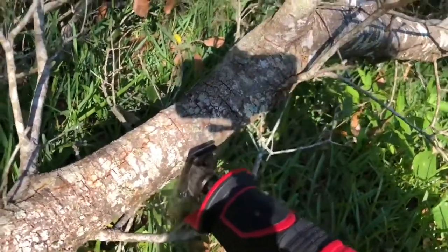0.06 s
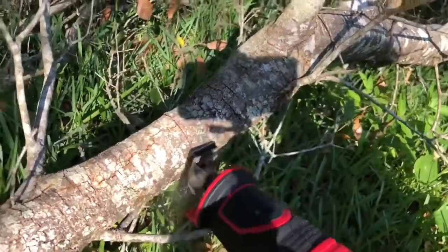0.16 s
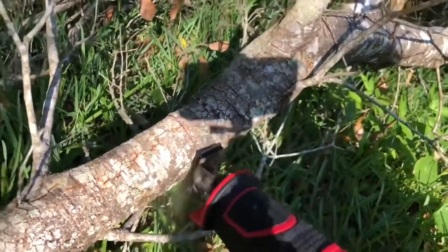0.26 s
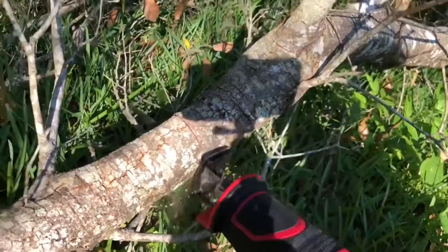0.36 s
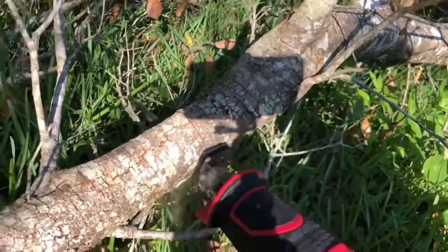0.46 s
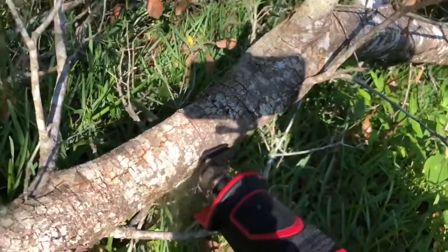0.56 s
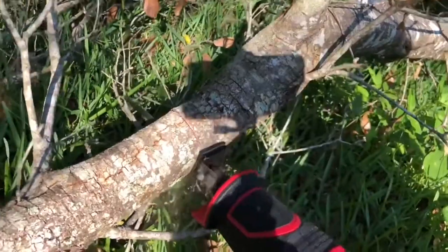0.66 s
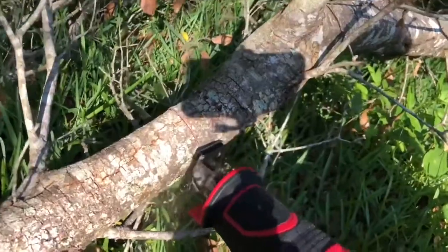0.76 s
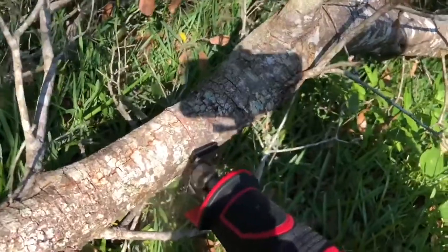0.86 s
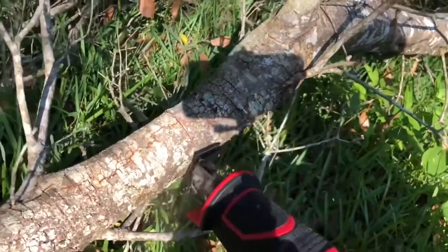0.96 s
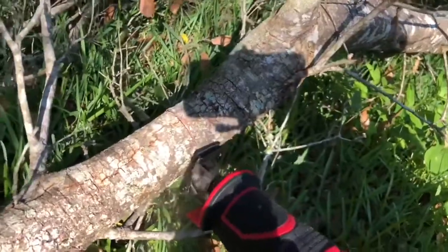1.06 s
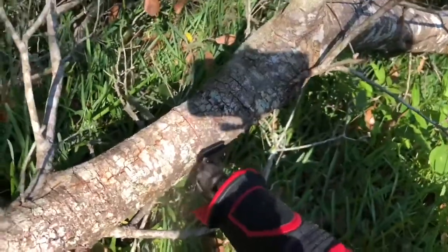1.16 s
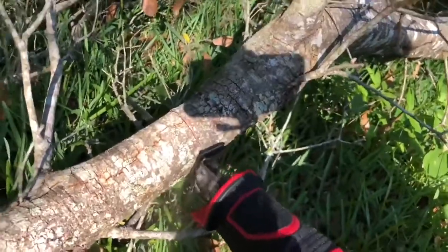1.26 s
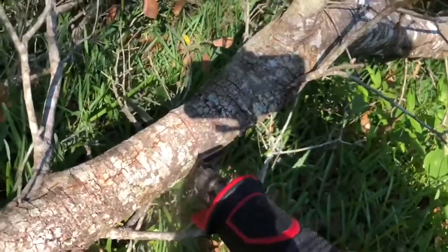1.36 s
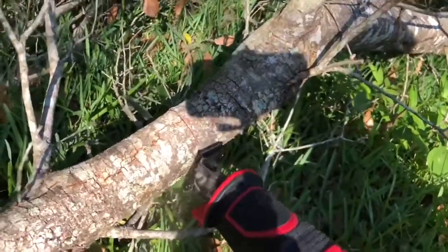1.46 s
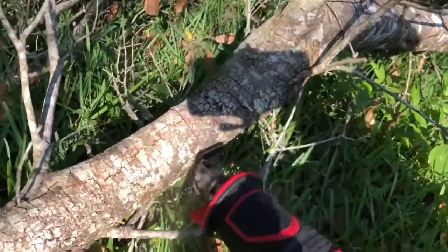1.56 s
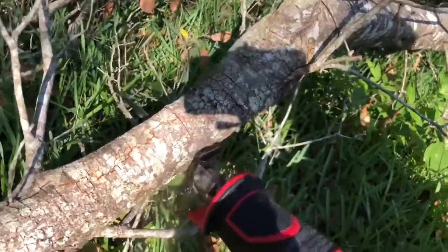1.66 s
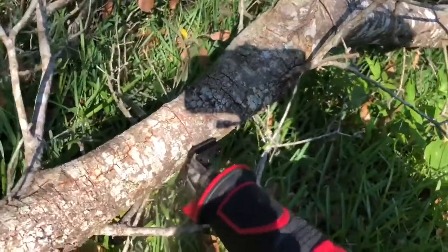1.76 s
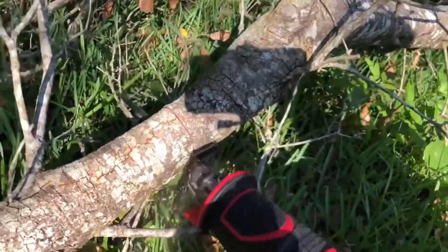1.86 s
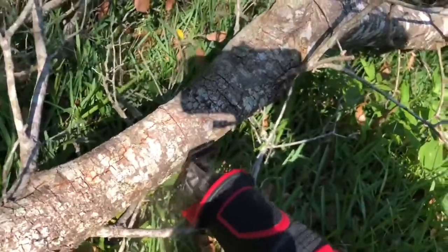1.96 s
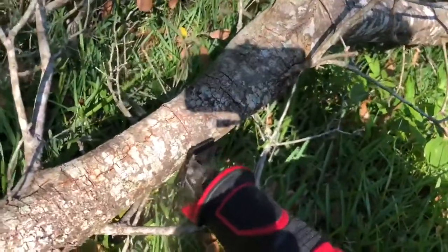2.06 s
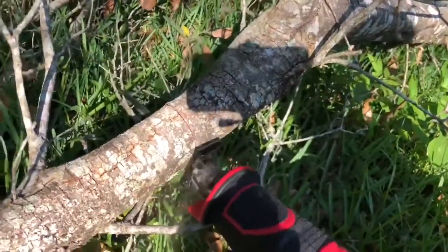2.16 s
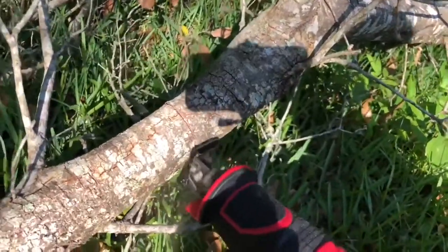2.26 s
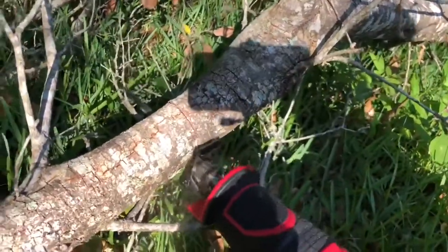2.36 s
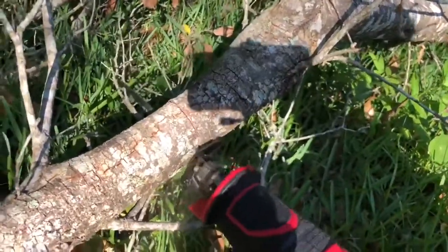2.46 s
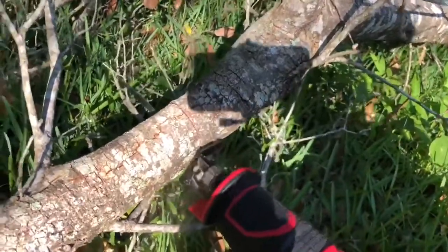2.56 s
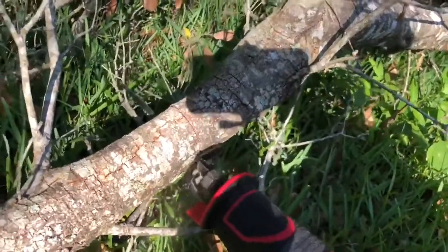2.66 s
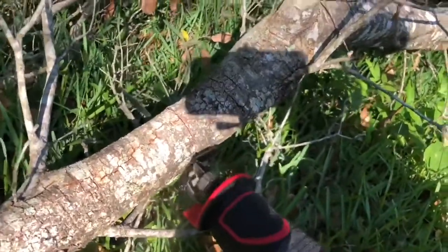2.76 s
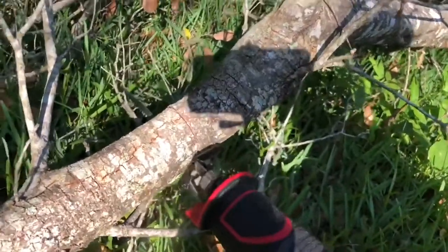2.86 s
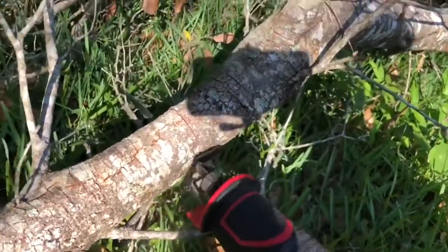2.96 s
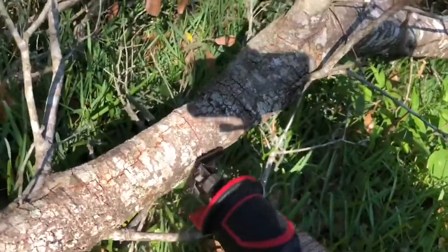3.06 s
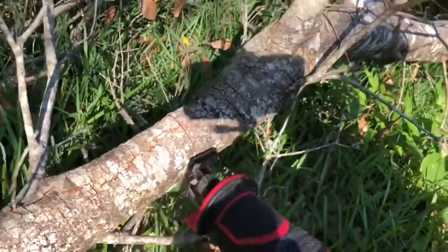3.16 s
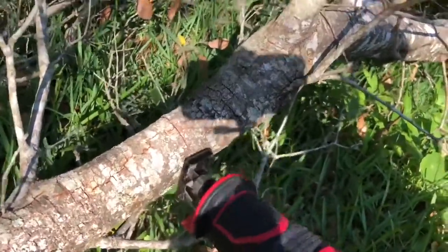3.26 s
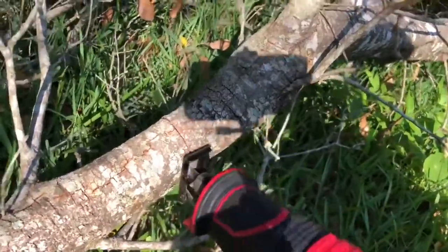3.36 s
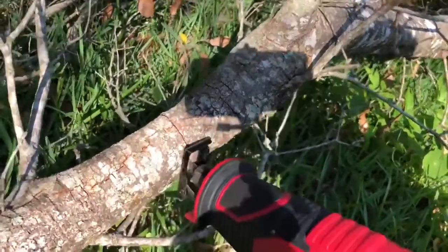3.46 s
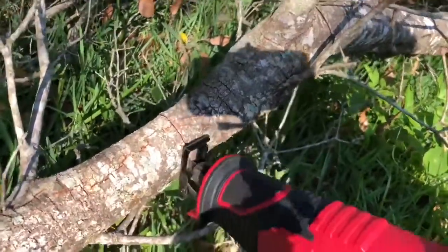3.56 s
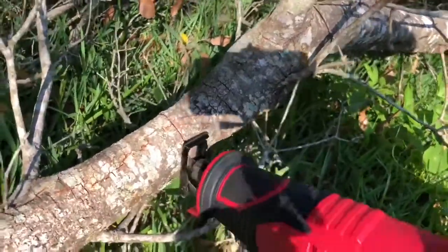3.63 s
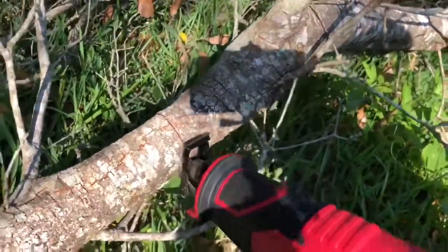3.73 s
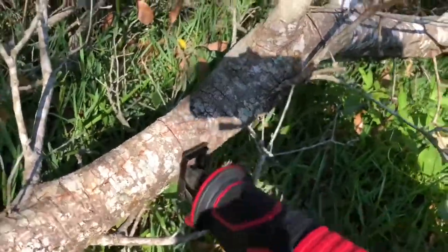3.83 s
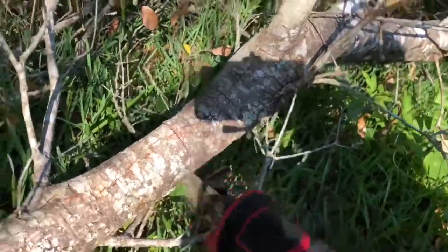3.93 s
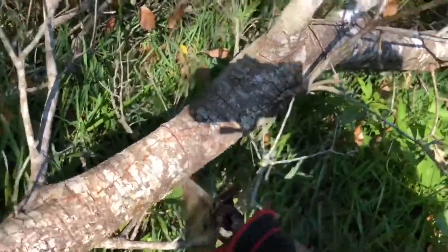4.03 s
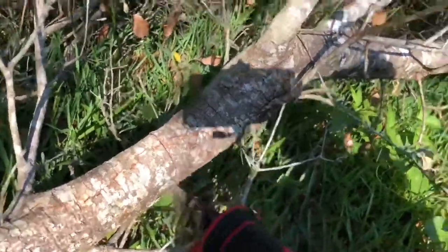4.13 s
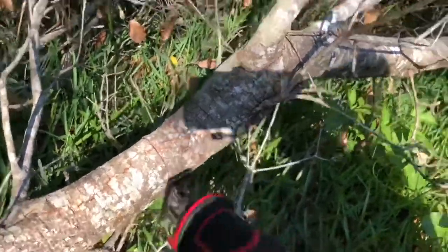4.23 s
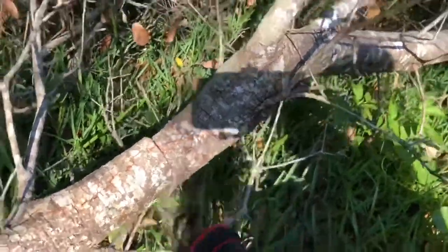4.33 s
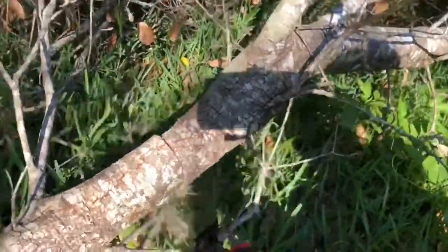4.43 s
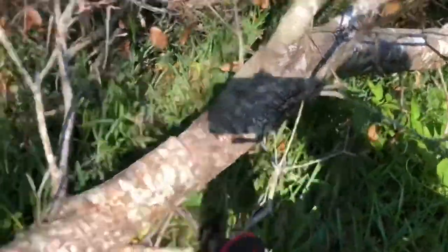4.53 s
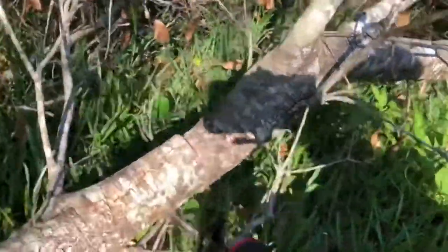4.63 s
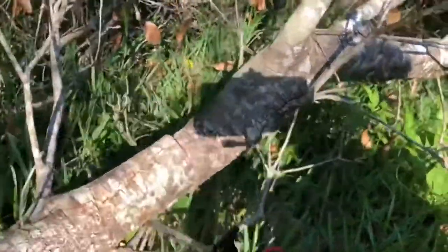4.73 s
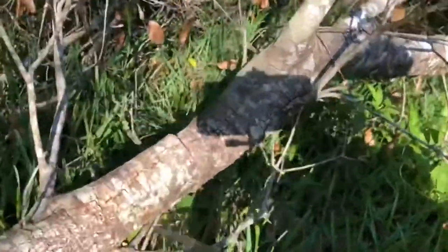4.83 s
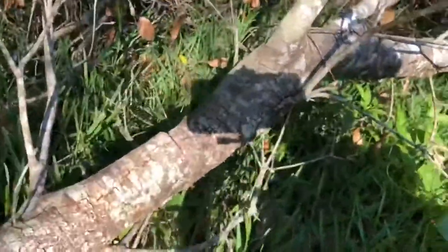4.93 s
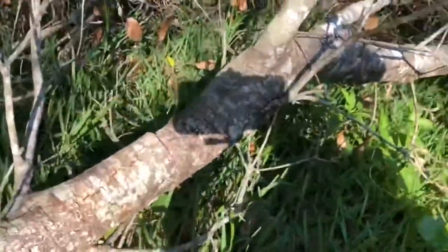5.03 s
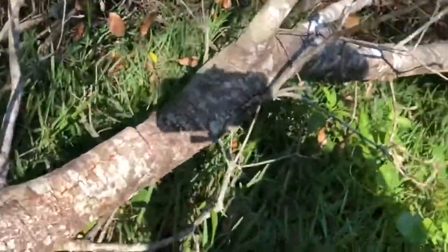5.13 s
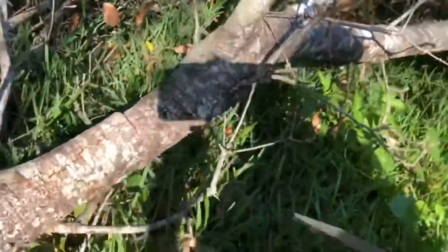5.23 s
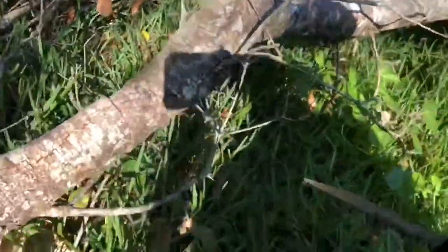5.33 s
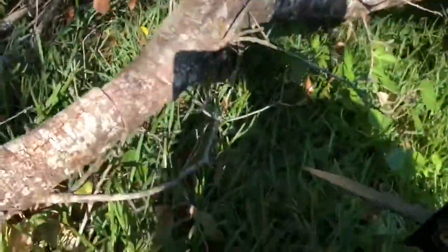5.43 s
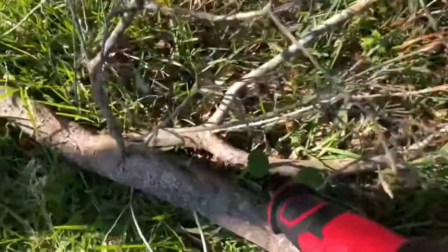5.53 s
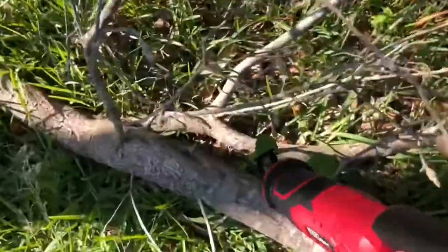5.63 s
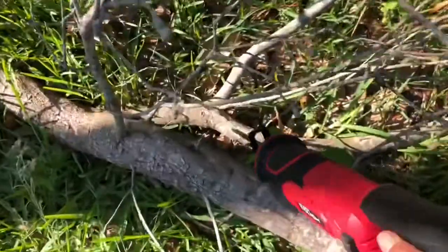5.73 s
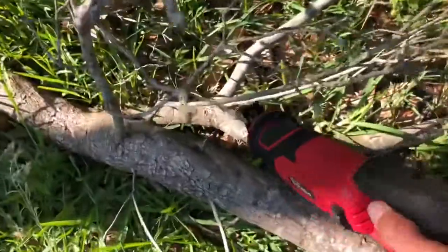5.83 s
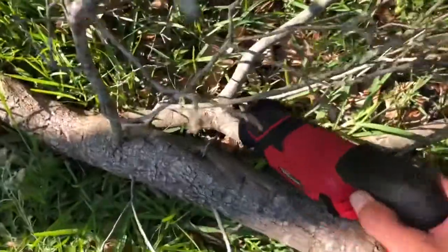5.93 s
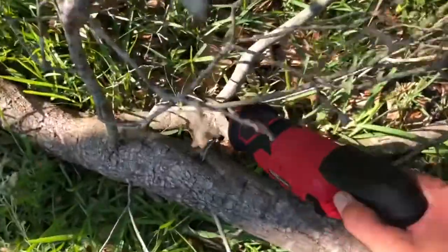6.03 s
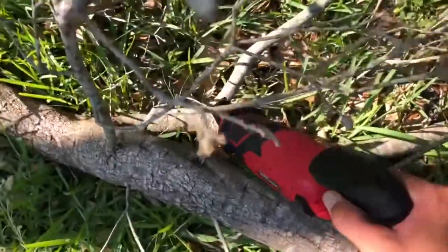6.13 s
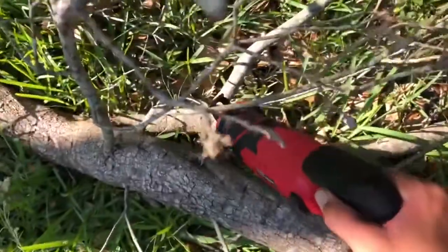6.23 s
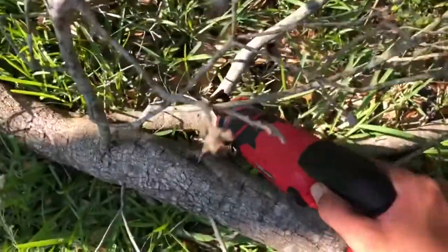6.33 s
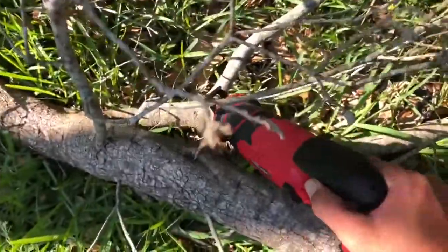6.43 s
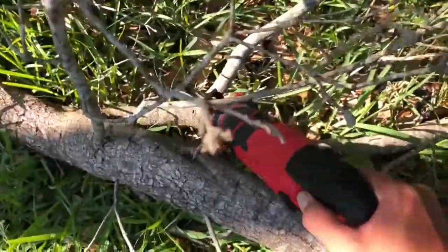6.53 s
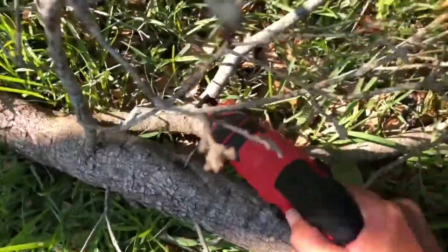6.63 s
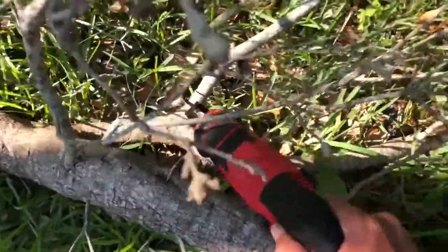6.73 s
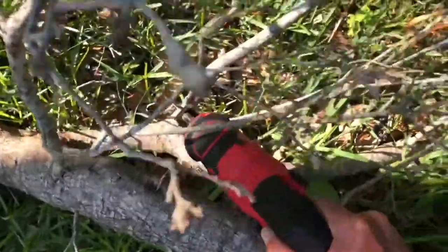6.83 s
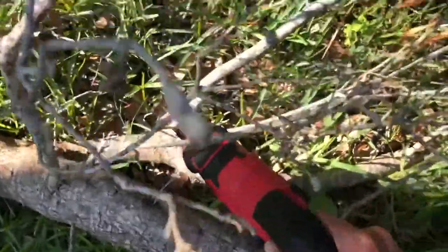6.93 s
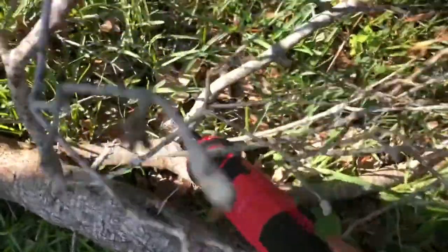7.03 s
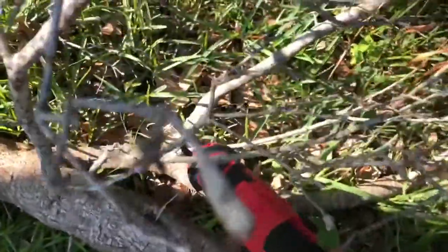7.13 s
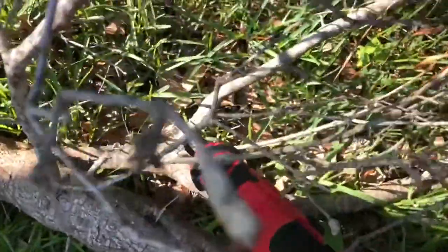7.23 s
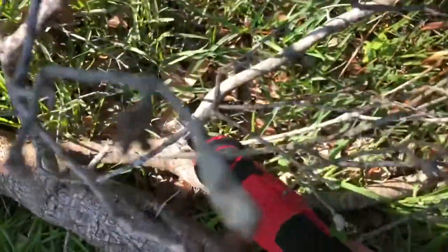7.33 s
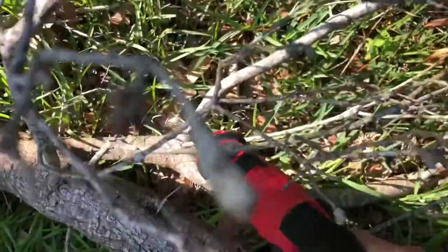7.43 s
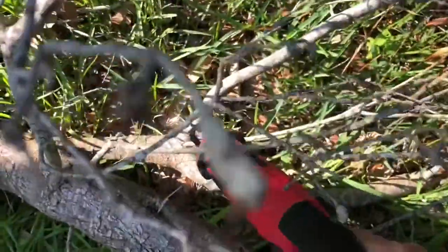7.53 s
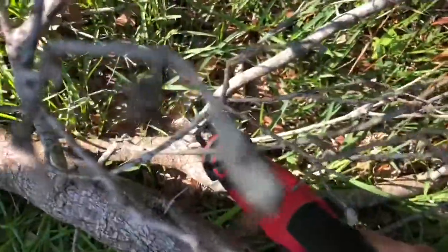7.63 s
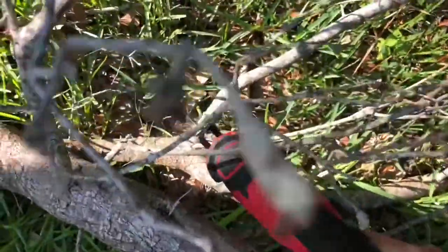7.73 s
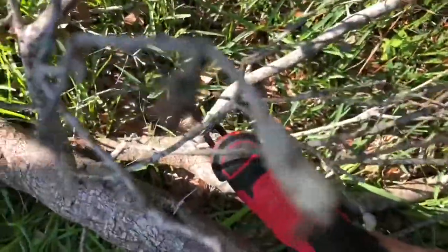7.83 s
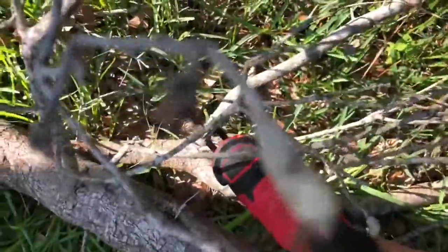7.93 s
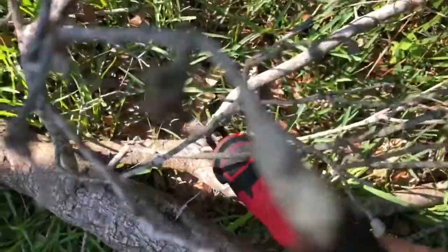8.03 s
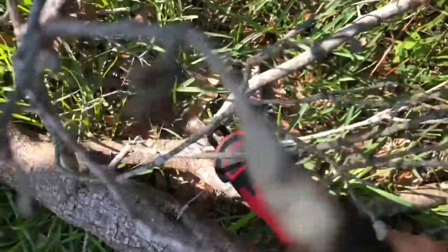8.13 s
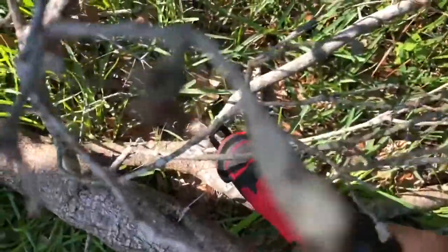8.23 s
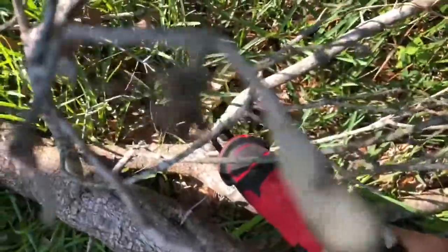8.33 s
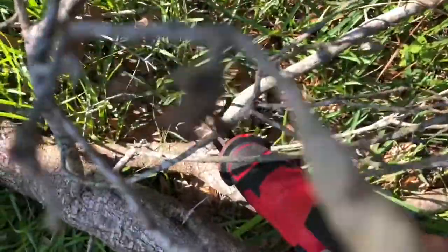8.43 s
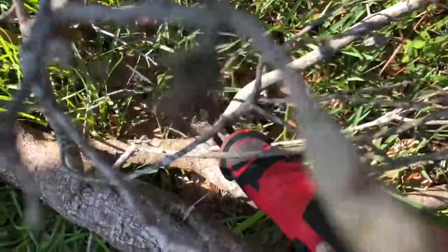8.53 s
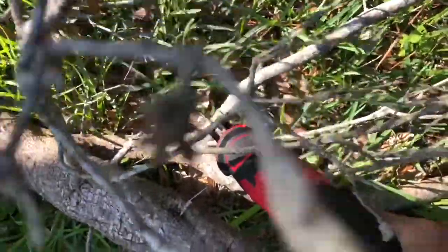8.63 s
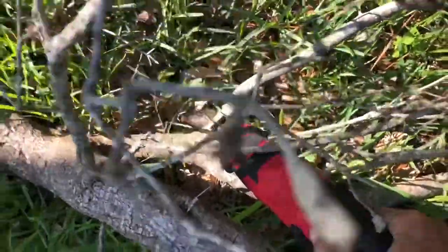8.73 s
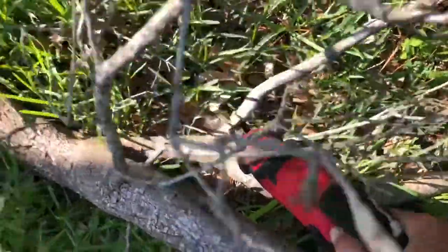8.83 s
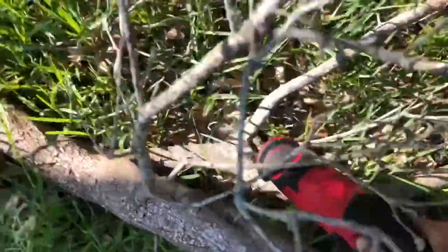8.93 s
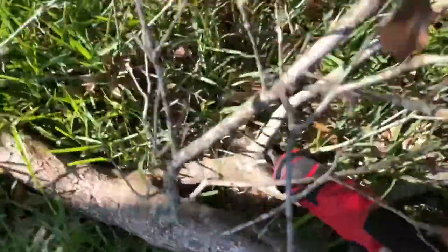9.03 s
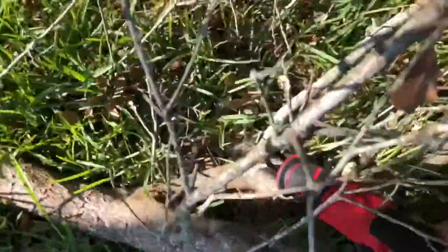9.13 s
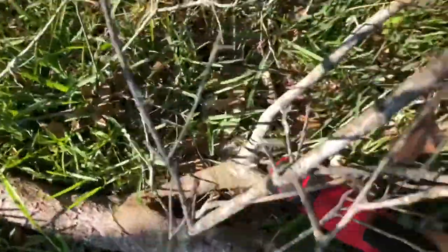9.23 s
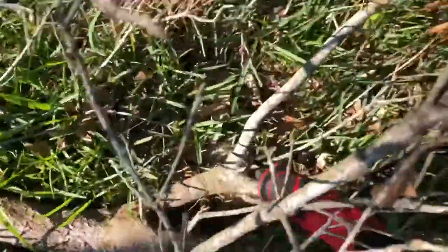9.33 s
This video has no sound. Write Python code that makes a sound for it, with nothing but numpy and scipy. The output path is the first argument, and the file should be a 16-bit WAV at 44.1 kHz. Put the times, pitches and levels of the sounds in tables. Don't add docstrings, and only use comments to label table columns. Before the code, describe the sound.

Three bursts of rapid, rough sawing dominate, dry and close to the microphone in open air. The first is long and steady, the second brief, the third fast and sustained. The gaps hold woody knocks, a small creak, the dull fall of the limb, and a thick crackle of snapping twigs and brushed leaves, over low wind buffeting and a faint electrical hum.

```python
import sys
import numpy as np
from scipy import signal
from scipy.fft import rfft, irfft
from scipy.io import wavfile
from scipy.ndimage import uniform_filter1d

SR = 44100
rng = np.random.default_rng(int(sys.argv[2]) if len(sys.argv) > 2 else 0)


def wav_record(signal):
    frames = np.transpose(np.atleast_2d(signal))
    bounded = np.clip(frames, -1, 1)
    quanta = np.round(bounded * 32767).astype(np.int16)
    wavfile.write(sys.argv[1], SR, quanta)


def level_to_linear(level):
    exponent = np.asarray(level, float) / 20
    return 10 ** exponent


N = 413658
T = np.arange(N) / SR

# t/s, hold/s, level/dB, fade/(dB/s)
GUSTS = [
    (0, .1, -58, 6),
    (2.2, 0.37, -44.5, 7.5),
    (3.049, .08, -49, 34),
    (3.45, .32, -52, 45),
    (4.5, 0.3, -49.5, 30),
    (5.2, 0.18, -56.5, 18),
    (6.9, .2, -48, 50),
    (9.3, 0.079, -56, 17),
]
GUST_RISE_DB_S, CALM_DB = 66, -65
# f/Hz, level/dB
HUM = [(59.2, -58), (118.4, -57.5), (177.6, -57.5), (242.2, -81), (360.7, -70)]
STILL_DB = (-61, -68, -79)
# t/s, width/s, level/dB
LEAF_DIP = (5.56, 0.023, -15)
# t/s, hold/s, level/dB, tilt from dull to airy/dB, fade/(dB/s)
RUSTLES = [(2.625, 0.04, -42, 7, 59.5), (3.43, 0.025, -63.5, 1, 67.5), (3.82, 0.05, -59.5, -12.5, 149),
           (4.729, 0.028, -39, 3.5, 148), (4.79, .01, -46.5, 5, 84), (4.88, 0.051, -60.5, -10, 112),
           (5.11, 0.018, -60, 9, 97), (5.248, 0.12, -71, 2, 81.5), (5.588, .08, -44.5, 7.5, 300),
           (5.734, 0.55, -50.5, 8, 60), (6.072, .05, -56.5, -3, 58), (6.145, 0.12, -53.5, 8, 128),
           (6.44, .06, -66, -1, 130)]
RUSTLE_RISE_DB_S, AIRY_DB, AIRY_TILT = 799, -7, 0.96
# t/s, peak level/dB, f/Hz
TWIG_SNAPS = [(2.7477, -25.5, 4780), (2.9816, -34, 3300), (3.5917, -44, 4550), (3.6985, -43, 4380),
              (3.8028, -32.5, 2980), (3.8164, -43, 4020), (3.8606, -28.5, 4340), (4.7718, -21, 6460),
              (4.8506, -22, 6070), (4.888, -26, 6840), (4.9504, -45, 3870), (4.9998, -44, 3910),
              (5.115, -21.5, 6460), (5.2348, -44.5, 4350), (5.35, -31.5, 8770), (5.4548, -35, 3500),
              (5.547, -52, 6600),
              (5.5675, -38, 3990), (5.5958, -25, 7630), (5.6198, -21, 8540), (5.7111, -30, 5220),
               (5.736, -33, 3680), (5.7714, -34, 2820), (5.8018, -22, 4500), (5.8283, -28, 2690),
               (5.9101, -25, 5760), (5.936, -25.5, 8900), (5.9535, -20.5, 7110), (6.0199, -23, 9920),
               (6.0553, -22, 9460), (6.0606, -20, 8760), (6.0812, -18.5, 4120), (6.1246, -31, 4970),
               (6.1421, -19, 6650), (6.187, -19, 6500), (6.1994, -22, 2910), (6.2209, -27, 2620),
               (6.2528, -25, 6000), (6.2708, -30, 2880), (6.3376, -29, 5420), (6.3528, -13.5, 3800),
               (6.3604, -21.5, 8960), (6.3905, -32, 7220), (6.4279, -23, 3920), (6.4425, -25, 3600),
               (6.4703, -34, 5480), (6.5327, -36, 3300),
              (4.8674, -35, 2480), (4.9214, -36, 2000), (4.9944, -37, 2330), (5.0314, -49, 7500),
               (5.0594, -49, 2350), (5.1364, -40, 7380), (5.1924, -49, 2380), (5.219, -45, 5020),
               (5.2444, -48, 4410), (5.2934, -47, 3010), (5.3374, -43, 8760), (5.3954, -46, 2290),
               (5.5774, -29, 6590), (5.6064, -32, 5610), (5.6444, -23, 6920), (5.6544, -27, 5060),
               (5.6834, -28, 3170), (5.6944, -33, 5400), (5.7514, -28, 8270), (5.7834, -27, 3560),
               (5.8164, -32, 3650), (5.8654, -36, 2720), (5.8894, -30, 5460), (5.9154, -29, 9530),
               (5.9754, -31, 11800), (5.9814, -32, 3410), (6.0144, -26, 6240), (6.0704, -22, 5270),
               (6.1024, -29.5, 3380), (6.1344, -24, 6630), (6.1524, -31, 5850), (6.1744, -25, 6550),
               (6.2244, -25, 7020), (6.2354, -36, 3430), (6.2844, -30, 9650), (6.3014, -33, 3590),
               (6.3714, -33, 5950), (6.3964, -33, 10100), (6.4534, -42, 5480), (6.4854, -41, 3360),
               (6.5684, -51, 2660), (6.5974, -52, 3920)]
# t/s, peak level/dB, f/Hz
TAPS = [(2.634, -20.5, 840), (2.748, -31, 1540), (3.0, -28.5, 1480), (3.022, -35, 1100), (3.063, -42, 2430),
        (3.168, -39.5, 2310), (3.528, -38.5, 877), (3.56, -35.5, 2480), (5.117, -38, 1096),
        (5.557, -44, 1450), (5.638, -31, 1100), (5.665, -40, 800), (5.804, -35, 1220), (5.824, -32, 980),
        (5.834, -35, 659), (5.967, -35, 1430), (6.103, -31, 1130), (6.111, -33, 1490), (6.066, -41, 420),
        (6.121, -38, 480), (6.626, -35, 1960)]
# t/s, peak level/dB, f/Hz
CLACKS = [(3.891, -17, 2600), (3.906, -14, 1040), (3.932, -8, 1200), (3.963, -3.5, 1550), (3.981, -3, 2350),
          (4.745, -23, 2300), (4.792, -27, 1400), (4.822, -28, 1740), (4.85, -32, 910), (4.889, -25.5, 830),
          (4.928, -28.5, 1700), (4.952, -28, 1500), (4.974, -29, 1200), (5.0, -25.5, 1280),
          (5.023, -41, 867)]
BURST = 1500
# t/s, level/dB, start f/Hz, end f/Hz, t60/s
THUMPS = [
    (3.012, -26, 90, 61.6, 0.4),
    (3.803, -23, 110, 58, 0.16),
    (4.635, -20, 220, 65.1, 0.099),
    (4.701, -9.5, 376, 50.3, 0.12),
    (4.93, -26, 260, 60, .08),
    (5.24, -25, 238, 60, 0.1),
    (5.51, -32, 150, 70, 0.087),
]
# start t/s, end t/s, start f/Hz, end f/Hz
CREAK = (3.105, 3.225, 165, 158)
# start t/s, end t/s, f/Hz, level/dB
SCRAPE = (5.78, 6.02, 1400, -56)
# t/s, level/dB
TRIGGER = (6.623, -45)
# f/Hz, level/dB
WHINE = [(1970, -2), (3940, 0), (5910, -9), (7880, -9), (9850, -24), (11820, -23)]
# t/s, push level/dB, bite (brightness of the teeth)/dB
CUTS = [
    [(0, -15, -2), (.18, -17, 0.5), (.32, -17.5, 1), (.45, -16.5, -1), (.65, -16, -1), (.8, -18, 0),
     (1.8, -17.5, 0), (2.4, -18, 0.5), (2.555, -19.5, -1)],
    [(3.89, -34.5, -9), (3.925, -27.5, -7.5), (3.99, -20.5, 0), (4.08, -16, -3), (4.18, -17, -2),
     (4.34, -18, -0.5), (4.42, -16, -1), (4.52, -19, 1.5), (4.645, -16.5, 0)],
    [(6.63, -55, -4), (6.68, -29, -4), (6.73, -19.5, 0.5), (6.9, -17.5, 1.5), (7.35, -18.5, 2.5),
     (7.6, -16, 0), (8.1, -17, -0.5), (8.42, -17, 2.5), (8.7, -17, 0), (8.93, -17.5, 1.5),
     (9.15, -16.5, -3.5), (9.38, -16.5, -3)],
]
# t/s, turns
CRANKS = [
    [(0, .01), (.1, 3.5), (.2, 7.05), (.3, 10.87), (.4, 14.8), (.6, 22.25), (.7, 25.84), (.9, 32.5),
     (1.0, 35.92), (1.2, 42.65), (1.4, 49.51), (1.8, 63.09), (1.9, 66.42), (2.1, 73.34), (2.3, 80.11),
     (2.5, 86.78)],
    [(3.89, .3), (3.92, 1.05), (3.95, 2.07), (4.05, 6.36), (4.25, 14.85), (4.45, 23.82), (4.65, 32.84)],
    [(6.63, .1), (6.68, 1.4), (6.72, 2.8), (6.75, 4.02), (6.85, 8.7), (7.05, 18.35), (7.15, 23.13),
     (7.3, 30.13), (7.5, 39.26), (7.85, 54.86), (8.1, 66.12), (8.35, 77.51), (8.65, 90.87), (8.75, 95.41),
     (9.05, 108.85), (9.25, 117.78), (9.35, 122.15)],
]
RESTS = [.55, .87, .73]
# blade level/dB, teeth level/dB, chips level/dB
BALANCE_DB = [(-0.74, -5, -12), (1.8, -5.5, -9), (-1.8, -4.5, -11.5)]
BITE_SHARE = (0.57, .55, 1.7)
# f/Hz, level/dB
COLOURS = [
    [(120, -48.5), (200, -21.5), (253, -14), (393, -14.5), (704, 0.5), (1220, 0.5), (2030, -2), (2520, 1),
     (3080, -2.5), (3500, -5), (5320, -18), (7660, -15), (15600, -29.5)],
    [(120, -54), (200, -23.5), (393, -17.5), (555, -7), (1190, -4.5), (2060, -9.5), (2520, -3),
     (3140, -9.5), (3500, -9.5), (5520, -15.5), (7660, -11), (15600, -22)],
    [(120, -57), (200, -26), (379, -16), (480, -6), (876, -5.5), (1070, -1.5), (2030, -10.5), (3140, -6.5),
     (4050, -10.5), (4860, -9.5), (5520, -15), (7800, -11), (15600, -25.5)],
]
# f/Hz, width/Hz, lift level/dB
RINGS = [
    [(1227, 87, 4), (1550, 170, 2.5), (2550, 230, 4.5), (3540, 390, 5.5), (7500, 600, 4), (8660, 250, 4)],
    [(1200, 110, 1.5), (1570, 170, 1.5), (2600, 230, 1), (3380, 230, 4.5), (7600, 400, 2.5)],
    [(1076, 61, 2.5), (1400, 400, 3.5), (2292, 130, 5.5), (3050, 180, 0.5), (6700, 290, 3),
     (8250, 120, -3.5), (9140, 240, 2.5)],
]
# angle/turn, limb, blade, teeth and chips level/dB
KNOCKS = [
    [(.12, 2, 8, 4, 3), (.22, 0, 4, 0, 2), (.33, 8.5, 9, 7, 7), (.62, 10, 6, 5, 3), (.75, 7, 3, 3, 5),
     (.85, 5, 3, 3, 5)],
    [(.03, 4, 0, 0, 2), (.12, 5, 0, 1, 4), (.32, 2, 0, 2, 2), (.48, 1, 3, -2, 0), (.59, 4, 9, 6, 6),
     (.66, 4, 7, 3, 5), (.93, 5, 2, 2, 3)],
    [(.07, -2, 0, 4, 5), (.11, 4, 0, -2, -2), (.32, 1, 4, 1, 0), (.4, 2, 4, 1, 0), (.48, 1, 1, 5, 6),
     (.58, 2, 1, 2, 1), (.81, 10, 5, 3, 4), (.93, 2, 2, 5, 6)],
]
SHAKE = [
    [-63, -64.5, -53.5, -52, -44, -59, -51, -48, -51.5, -58, -62, -56, -50.5, -52, -36.5],
    [-73, -65.5, -47, -51.5, -59, -47, -48.5, -52.5, -77, -53, -42.5],
    [-71, -78, -80.5, -54.5, -56.5, -50.5, -48.5, -48, -44.5, -39.5, -38.5],
]
BITE_DB = [4.5, 2.5, 2]
# low f/Hz, high f/Hz, knock, tear, grind and note level/dB, knock tail/s
PARTS = [
    (99.6, 1857, -3.5, -5.5, -2.5, -10, 0.0025),
    (1700, 4510, -1, -3, -1.5, -9, 0.0022),
    (4466, 9500, -5.5, -6, -1, -8.5, .0025),
    (9400, 16500, -3, -6.5, -2, -13, .002),
]
NOTES = 9
BRAKE_S, BRAKE_DB, BRAKE_SLOWS, BRAKE_DULL_DB = .105, 29.5, 0.34, 3.5
REST_DB, REST_TURNS, STRIKE = -4.5, .06, -10
LURCHES = [0.249, .59, .82, 1.25, 1.55, 1.87, 2.129, 2.44, 7.5, 7.95, 8.7, 9.2]
LURCH_RISE_S, LURCH_FADE_S, LURCH_DB, LURCH_THUD_DB = 0.0098, 0.13, 6, -35
GEAR_HZ, GEAR_DB, GEAR_FADE_S = 7300, -7, .4
CHATTER_DB, CHATTER_RATE = .5, 22


def level(x, db=0.):
    return x * level_to_linear(db) / np.sqrt(np.mean(x ** 2) + 1e-30)


def shape(x, gain):
    hz = np.maximum(np.fft.rfftfreq(4096, 1 / SR), 1)
    cepstrum = irfft(np.log(gain(hz) + 1e-5))
    cepstrum[1:2048] *= 2
    cepstrum[2049:] = 0
    impulse = irfft(np.exp(rfft(cepstrum)))
    return signal.fftconvolve(x, impulse)[:len(x)]


def band(lo_hz, hi_hz, order=4):
    return lambda hz: ((1 + (lo_hz / hz) ** (2 * order)) * (1 + (hz / hi_hz) ** (2 * order))) ** -.5


def ring(x, hz, width_hz):
    r = np.exp(-np.pi * width_hz / SR)
    return signal.lfilter([1, 0, -1], [1, -2 * r * np.cos(2 * np.pi * hz / SR), r * r], x) * (1 - r)


def walk(n, rate):
    k = int(SR / rate)
    steps = np.repeat(rng.standard_normal(n // k + 1), k)
    return level(uniform_filter1d(steps, k)[:n])


def clicks(n, rate, spread_db):
    size = level_to_linear(spread_db * np.minimum(rng.exponential(size=n), 3))
    return (rng.random(n) < rate / SR) * rng.choice([-1, 1], n) * size


def swell(s, hold, db, fade, rise):
    return level_to_linear(db - rise * np.maximum(s - T, 0) - fade * np.maximum(T - s - hold, 0))


def burst(hz, wide, decay):
    t = T[:BURST]
    envelope = np.exp(-t / decay) * (1 - np.exp(-t / 0.00018))
    x = shape(rng.standard_normal(BURST) * envelope, band(hz / wide, hz * wide, order=3))
    return x / np.abs(x).max()


def place(out, t0, x):
    i = int(t0 * SR)
    return out + np.pad(x, (i, N))[:N]


def air():
    gust_power = sum(swell(*gust, GUST_RISE_DB_S) ** 2 for gust in GUSTS)
    low_db = 10 * np.log10(level_to_linear(CALM_DB) ** 2 + gust_power)
    low = level(shape(rng.standard_normal(N), band(42, 76, order=3))) * level_to_linear(low_db + 1.6 * walk(N, 8.2))
    upper = level(shape(rng.standard_normal(N), band(110, 160, order=3)))
    upper = upper * level_to_linear(-61.0 + 0.24 * (low_db + 54.5))
    hum = sum(level_to_linear(db + 4.0 + 2.5 * walk(N, 5.5)) * np.sin(2 * np.pi * hz * T) for hz, db in HUM)
    hum_gain = np.interp(T, [4.6, 5.0, 5.5, 5.56, 5.65, 6.7, 7.2],
                         [0.047, 0.68, 0.9, 0.079, 0.84, 0.94, 0.33])
    return low + upper + hum * hum_gain


def leaves():
    out = 0
    brush = level_to_linear(np.where(T < 5.5, .6, 1.8) * walk(N, 140))
    hush = level_to_linear(LEAF_DIP[2] * np.exp(-((T - LEAF_DIP[0]) / LEAF_DIP[1]) ** 2))
    for k, (lo, hi) in enumerate([(250, 1260), (1700, 6500), (7000, 15000)]):
        power = (level_to_linear(STILL_DB[k]) * hush) ** 2
        for s, hold, db, tilt, fade in RUSTLES:
            lift_db = (-tilt, 0, AIRY_DB + AIRY_TILT * tilt)[k]
            power = power + swell(s, hold, db + lift_db, fade * (.9, 1, 1.2)[k], RUSTLE_RISE_DB_S) ** 2
        fine = level(clicks(N, 1200, 4.4), -2.5)
        coarse = level(clicks(N, 240, 4.0), -2.5)
        contact = shape(coarse + fine + rng.standard_normal(N), band(lo, hi, order=3))
        out = out + np.sqrt(power) * level(contact * brush)
    return out


def snaps():
    out = np.zeros(N)
    for s, db, hz in TWIG_SNAPS:
        crack = burst(hz, 1.45, 0.00128)
        fizz = level_to_linear(-30.0 + hz / 550) * burst(12000, 1.37, 0.00087)
        out[int(s * SR):][:BURST] += level_to_linear(db - 3.0) * (crack + fizz)
    for s, db, hz in TAPS + CLACKS:
        decay = 0.0029 * np.sqrt(1200 / hz)
        knock = burst(hz, 1.0, decay)
        overtone = 0.4 * burst(2.1 * hz, 2.0, 1.2 * decay)
        undertone = 0.34 * burst(0.51 * hz, 2.2, 3.9 * decay)
        out[int(s * SR):][:BURST] += level_to_linear(db - 0.7) * (knock + overtone + undertone)
    return out


def wood():
    out, t = 0, T[:15000]
    for s, db, hz0, hz1, t60 in THUMPS:
        hz = hz1 + (hz0 - hz1) * np.exp(-t / 0.0072)
        envelope = level_to_linear(db - 60 * t / t60) * (1 - np.exp(-t / 0.015))
        out = place(out, s, envelope * np.sin(2 * np.pi * np.cumsum(hz) / SR))
    s0, s1, hz0, hz1 = CREAK
    n = int((s1 - s0) * SR)
    phase = 2 * np.pi * np.cumsum(np.linspace(hz0, hz1, n)) / SR
    creak = 0.3 * np.sin(phase) + np.sin(2 * phase) + 0.3 * np.sin(3 * phase)
    out = place(out, s0, level_to_linear(-47.5) * creak * np.hanning(n) ** .5)
    s0, s1, hz, db = SCRAPE
    n = int((s1 - s0) * SR)
    scrape = level(ring(rng.standard_normal(n), hz, 45.), db)
    return place(out, s0, scrape * np.hanning(n) ** .5)


def trigger():
    t = T[:4000]
    whine = sum(level_to_linear(db) * np.sin(2 * np.pi * hz * t) for hz, db in WHINE)
    return place(0, TRIGGER[0], level_to_linear(TRIGGER[1]) * whine * np.exp(-(t / .055) ** 2))


def crank_turns(t, crank, braked):
    s, done = np.transpose(crank)
    stretch = np.clip(np.searchsorted(s, t) - 1, 0, len(s) - 2)
    speed = uniform_filter1d((np.diff(done) / np.diff(s))[stretch], size=2000)
    return done[0] + np.cumsum(speed * (1 - BRAKE_SLOWS * braked)) / SR


def lurching(t):
    since = np.maximum(t[:, None] - LURCHES, 0)
    return ((1 - np.exp(-since / LURCH_RISE_S)) * np.exp(-since / LURCH_FADE_S)).sum(axis=1)


def saw_parts(turns, rest, knocks, bite_db, body, parts_db):
    n = len(turns)
    from_rest = (turns - rest + .5) % 1 - .5
    moving = level_to_linear(REST_DB * np.exp(-(from_rest / REST_TURNS) ** 2))
    count, knocks = int(turns[-1]) + 1, np.array(knocks)
    chance = rng.standard_normal((count, len(knocks), 2))
    angle = np.arange(count)[:, None] + knocks[:, 0] + .008 * chance[..., 0]
    at = np.clip(np.searchsorted(turns, angle), 0, n - 1)
    tear = clicks(n, 1500, 2.8) * moving
    chatter_db = CHATTER_DB * walk(n, CHATTER_RATE)
    out = 0
    for k, (lo, hi, knock_db, tear_db, grind_db, note_db, tail) in enumerate(PARTS):
        blows = np.zeros(n)
        own_chance = 1.2 * rng.standard_normal(at.shape)
        blows[at] = level_to_linear(1.3 * knocks[:, k + 1] + 1.5 * chance[..., 1] + own_chance)
        rattle = signal.lfilter([1], [1, -np.exp(-1 / (tail * SR))], blows)
        knock = rattle * rng.standard_normal(n) + STRIKE * blows
        grind = rng.standard_normal(n) * level_to_linear(1.2 * walk(n, 25.05)) * moving
        notes = 0
        for hz in np.geomspace(max(lo, 600), hi, NOTES):
            note_gain = level_to_linear(4.1 * rng.standard_normal(n) + (3.5 + 0.77 * k) * walk(n, 3))
            notes = notes + ring((blows + 0.38 * tear) * note_gain, hz, 130 + 0.0071 * hz)
        drive = level(knock, knock_db + bite_db) + level(tear * (1.1 + level(rattle)), tear_db)
        drive = drive + level(grind, grind_db) + level(notes, note_db + bite_db)
        part = shape(drive, lambda hz: body(hz) * band(lo, hi, order=6)(hz))
        part = part / np.sqrt(uniform_filter1d(part ** 2, 9000))
        out = out + part * level_to_linear(0.04 + 0.55 * k + chatter_db + parts_db[k])
    return out


def limb_shake(t, turns, shake, limb_db, lurch):
    n, out = len(t), 0
    going = level_to_linear(np.minimum(limb_db - np.median(limb_db), 0))
    for k, db in enumerate(shake):
        gain = level_to_linear(db - 0.7 + LURCH_DB * lurch + 3.0 * walk(n, 6))
        out = out + going * gain * np.sin(2 * np.pi * (k + 1) * turns + .5 * walk(n, 8))
    thud = level(ring(rng.standard_normal(n), 190., 190.), LURCH_THUD_DB)
    return out + thud * going * lurch ** 3 * (t < 3)


def gear_hiss(t):
    hiss = shape(rng.standard_normal(len(t)), band(GEAR_HZ / 1.08, GEAR_HZ * 1.05))
    fresh = t[0] > 0
    return level(hiss, GEAR_DB) * np.exp(-(t - t[0]) / GEAR_FADE_S) * fresh


def cut(table, crank, rest, balance, colour, rings, knocks, shake, bite_db):
    release = table[-1][0]
    t = T[int(table[0][0] * SR):int((release + BRAKE_S) * SR)]
    s, push, bright = np.transpose(table)
    push_db, bright_db = np.interp(t, s, push), np.interp(t, s, bright)
    braked = np.maximum(t - release, 0) / BRAKE_S
    turns = crank_turns(t, crank, braked)
    limb_db = push_db - BRAKE_DB * braked ** 2
    bite = bright_db - BRAKE_DULL_DB * braked
    parts_db = [limb_db] + [limb_db + db + share * bite for db, share in zip(balance, BITE_SHARE)]
    colour_hz, colour_db = np.transpose(colour)

    def body(hz):
        lift_db = sum(db / (1 + (2 * (hz - c) / w) ** 2) for c, w, db in rings)
        return level_to_linear(np.interp(np.log(hz), np.log(colour_hz), colour_db) + lift_db)

    out = saw_parts(turns, rest, knocks, bite_db, body, parts_db)
    out = out + limb_shake(t, turns, shake, limb_db, lurching(t))
    return place(0, t[0], out + gear_hiss(t) * level_to_linear(limb_db))


def scene():
    background = air() + leaves() + snaps() + wood()
    runs = zip(CUTS, CRANKS, RESTS, BALANCE_DB, COLOURS, RINGS, KNOCKS, SHAKE, BITE_DB)
    saw = sum(cut(*run) for run in runs)
    return (background + trigger() + saw)[None]


def top_cut(x):
    return signal.sosfilt(signal.butter(12, 16530, fs=SR, output="sos"), x)


def record(dry):
    rounded = 1.05 * np.tanh(dry / 1.05)
    top = signal.ellip(10, .3, 40, 15800, fs=SR, output="sos")
    mix = signal.sosfilt(top, rounded)
    return top_cut(mix)


dry = scene()
out = record(dry)
wav_record(out)
```